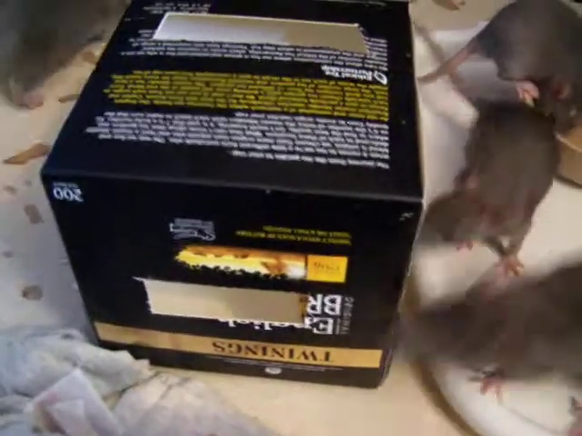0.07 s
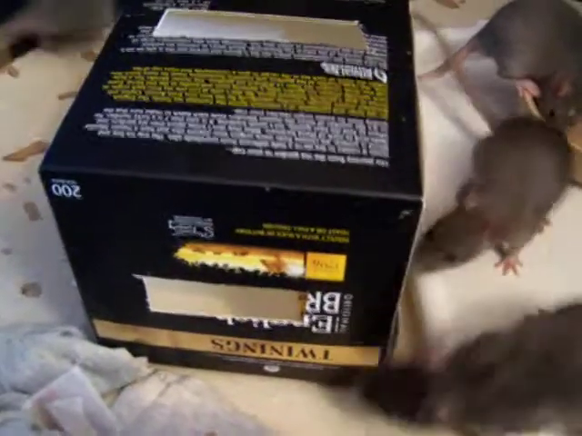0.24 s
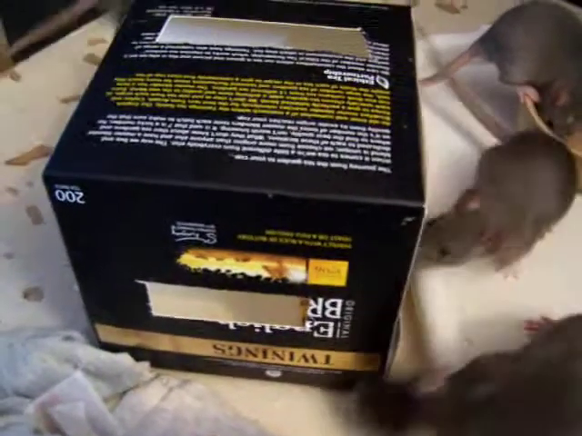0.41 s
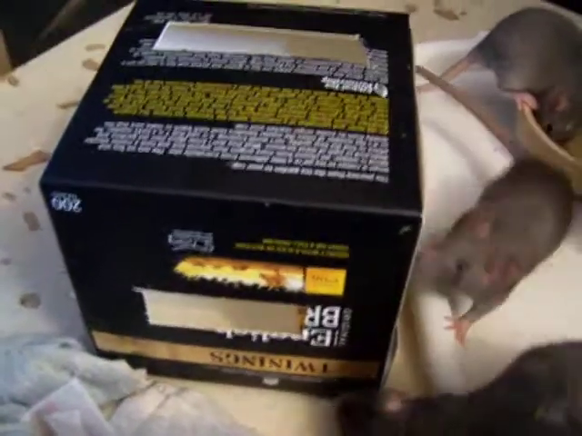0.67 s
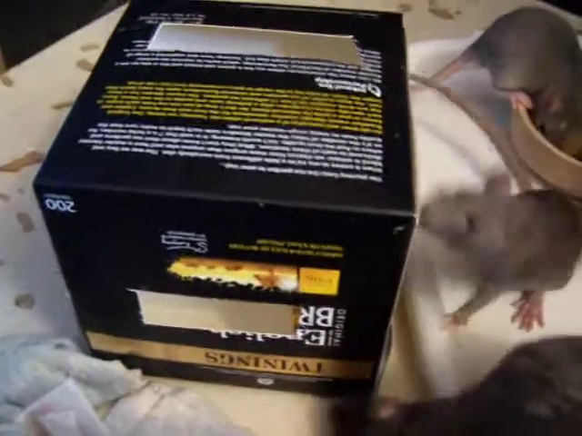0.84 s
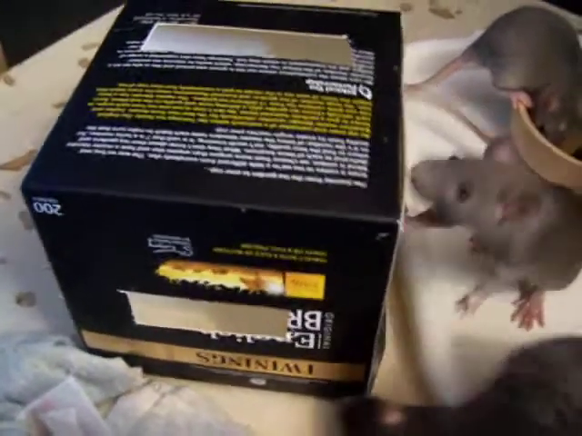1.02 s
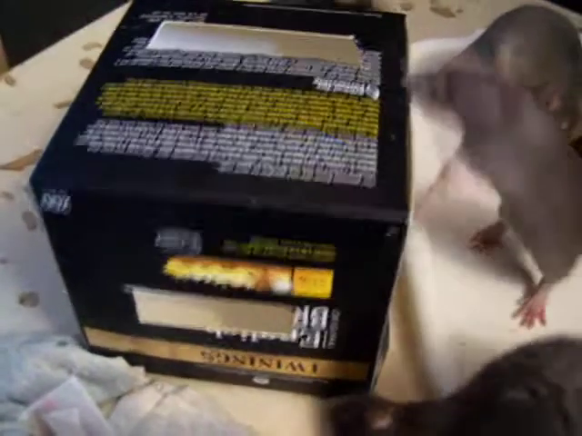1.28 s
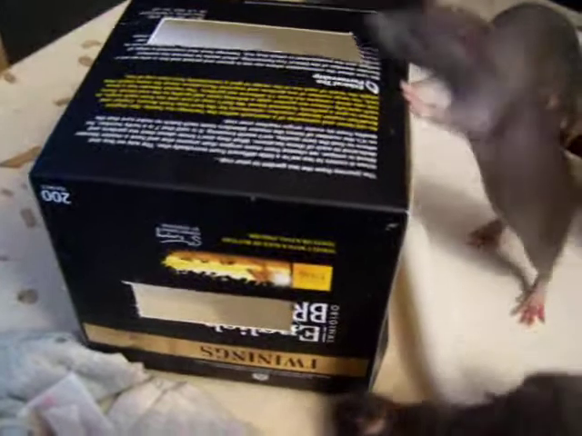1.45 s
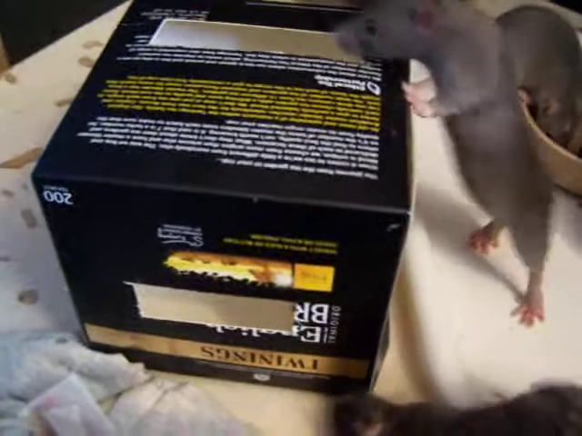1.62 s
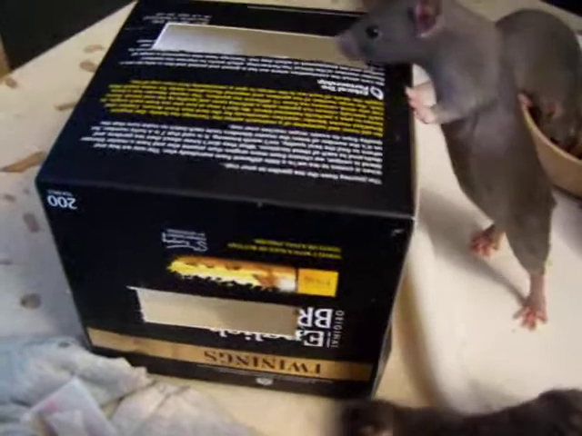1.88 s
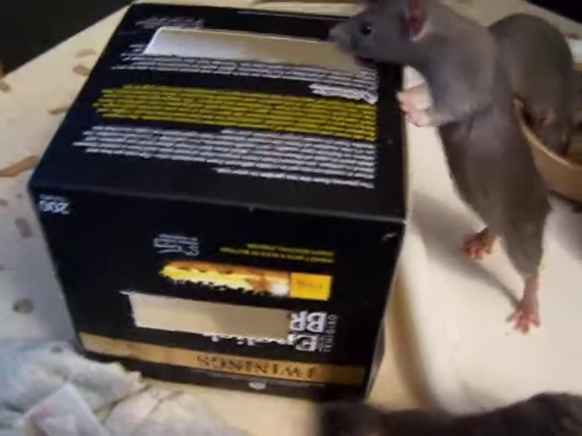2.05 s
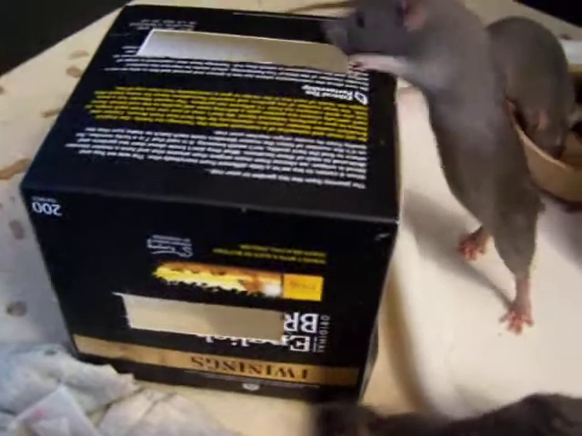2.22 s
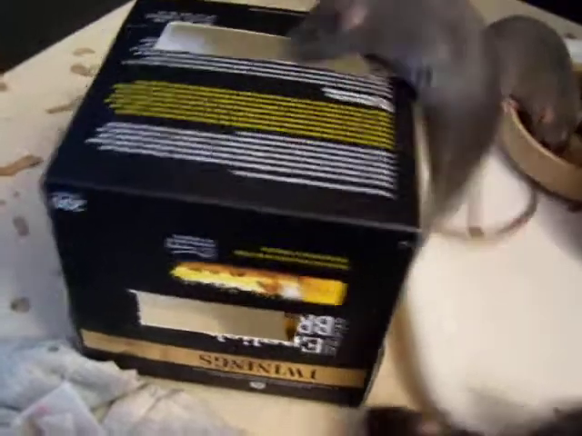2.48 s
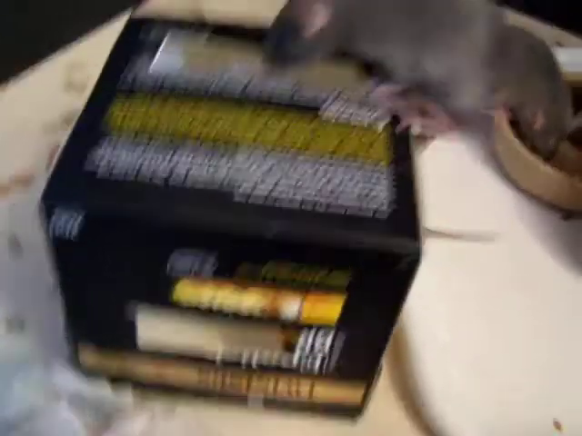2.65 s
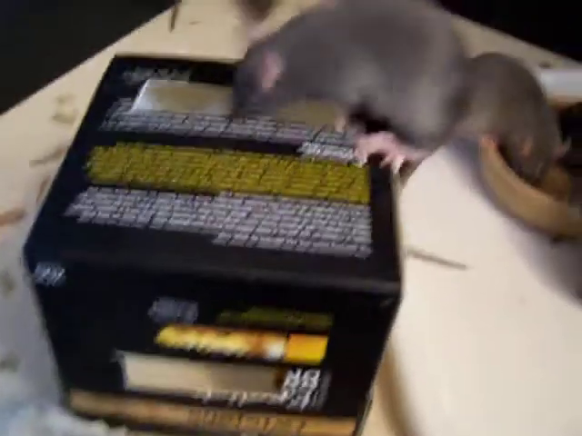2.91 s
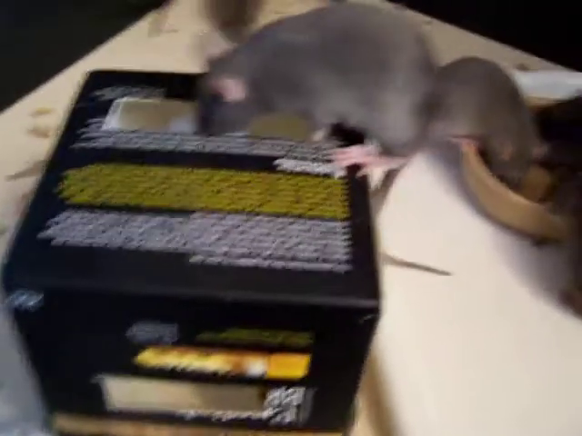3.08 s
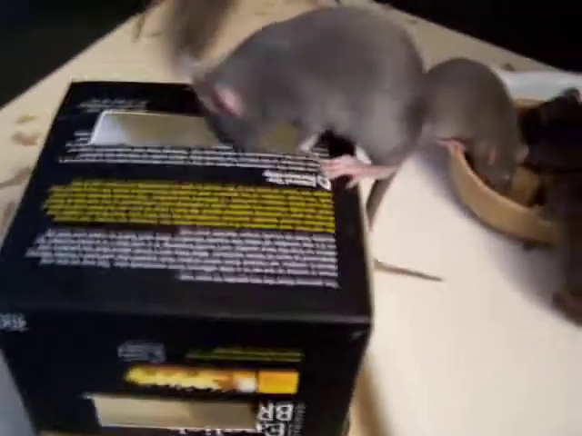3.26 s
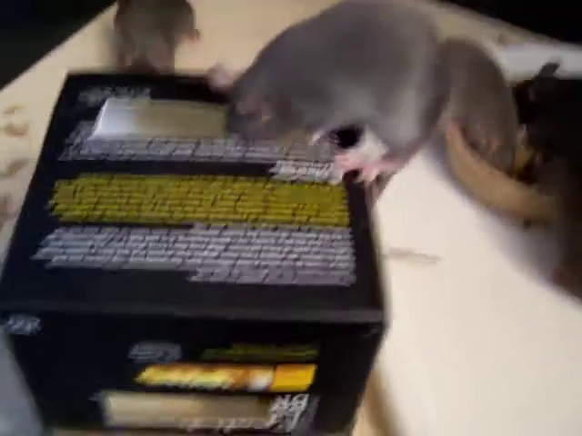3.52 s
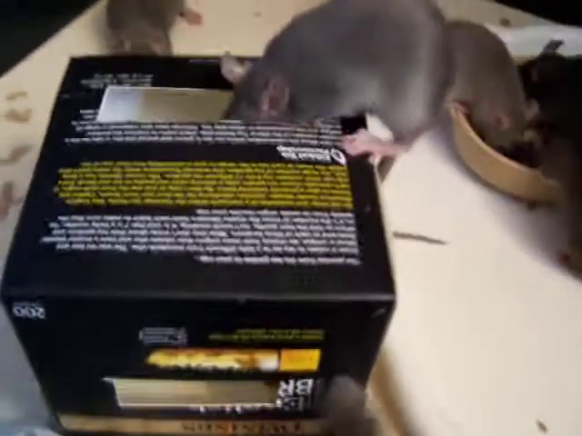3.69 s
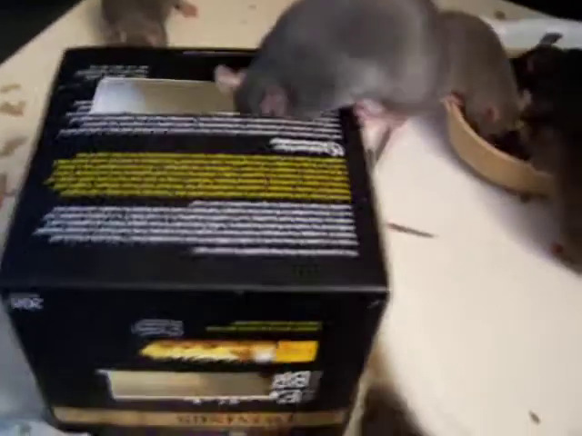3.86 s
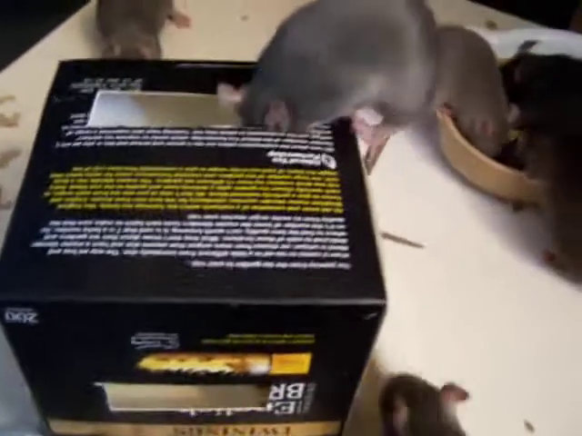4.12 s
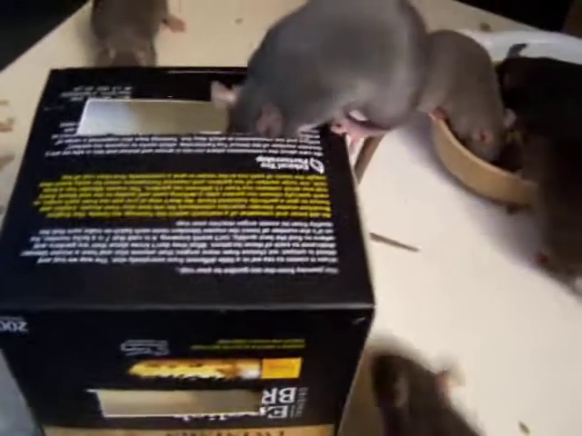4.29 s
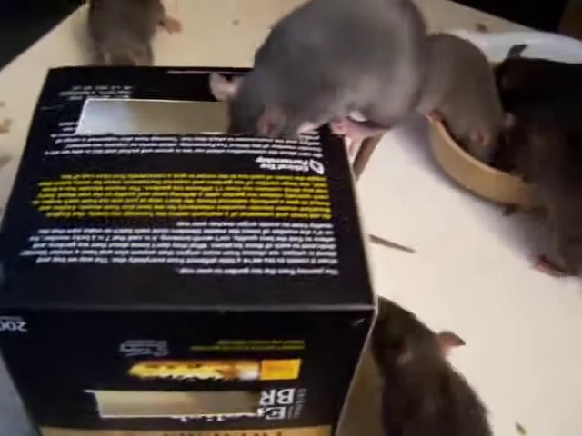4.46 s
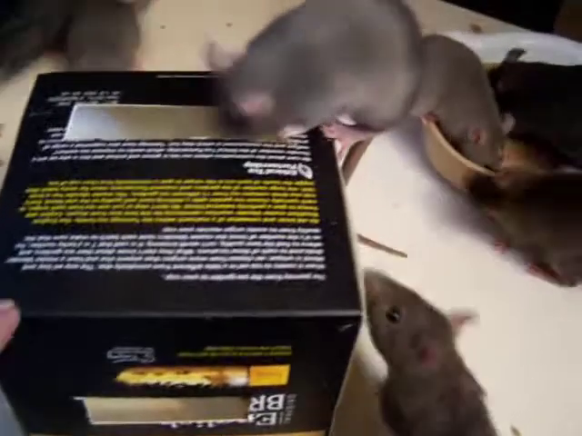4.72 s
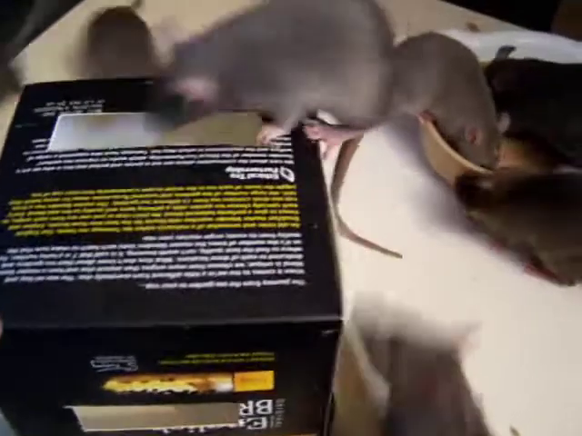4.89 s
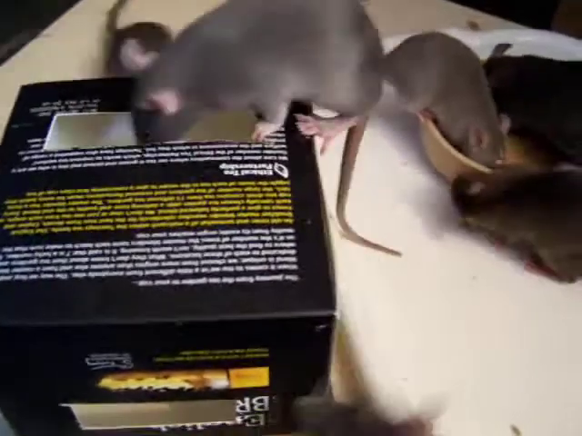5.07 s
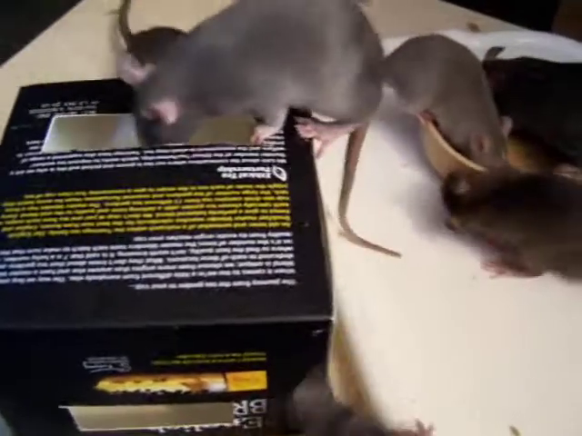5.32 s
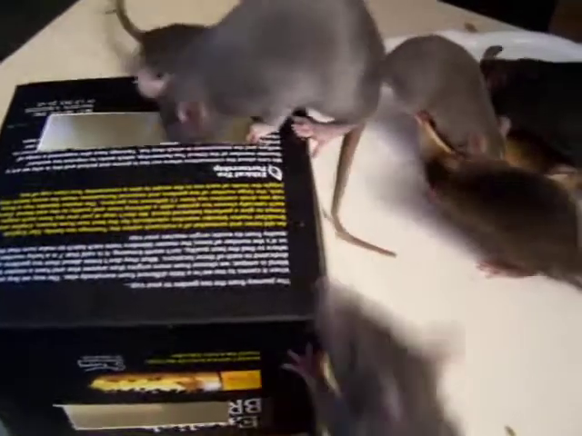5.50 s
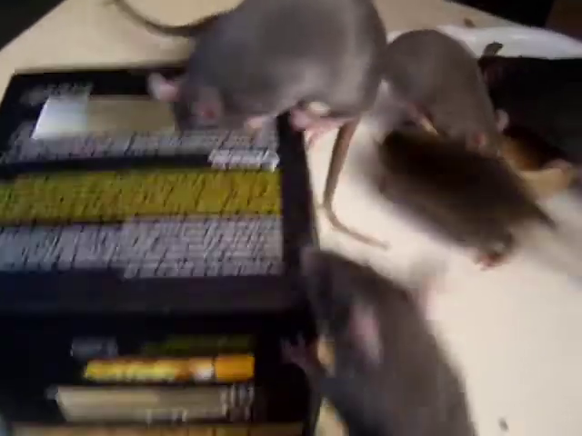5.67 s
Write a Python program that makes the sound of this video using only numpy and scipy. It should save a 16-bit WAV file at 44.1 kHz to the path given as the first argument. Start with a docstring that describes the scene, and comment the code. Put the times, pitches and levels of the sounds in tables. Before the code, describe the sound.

Heard closely from above, young rats clamber on a small hollow cardboard box in a quiet room. From 0 to 1 second, a run of light claw scratches and ticks mixes with soft paw thumps, with a clearer scratch near 0.85. Around 1 to 1.5 come brief dry foot wipes and low bumps, then a sparser stretch of ticks to 2.3. At 2.4 to 3 the climb is busiest: hollow knocks, two strong scrapes at about 2.5 and 2.6, short ringing rasps, swelling rustle and a crisp tick. A sharp snap lands at 3.5 amid sliding. Softer scuffs follow, with a strong click near 4.5, quick bright ticks around 4.8, and small scratches and bumps from 5.2 to the end. Fine pattering runs throughout. Close walls add a short diffuse tail; soft room noise and a faint, wavering high whine stay beneath, through a small narrow-band microphone.

```python
"""Young rats clamber on a small cardboard box in a quiet room, heard by a small microphone close above.
Claws catch and skid on the stiff card in runs of tiny slips, and longer drags make one resonance ring.
Paws thump the hollow panels: a swinging panel, box modes and a dull thud. Fur and feet slide in a fine
rustle of filtered friction grains, and small scuffs patter round the box.
Close walls add a short, diffuse tail. Behind lie soft, coloured room noise and a faint, wavering whine."""
import sys
import numpy as np
from scipy import signal
from scipy.fft import rfft, irfft
from scipy.io import wavfile

SR = 44100
rng = np.random.default_rng(int(sys.argv[2]) if len(sys.argv) > 2 else 0)


def put_to_file(sound):
    """Save the sound as 16-bit audio at rate SR, in the file named by the first command-line argument."""
    columns = np.atleast_2d(sound).T  # one column per channel
    safe = np.clip(columns, -1, 1)
    whole_steps = np.round(safe * 32767)
    wavfile.write(sys.argv[1], SR, whole_steps.astype(np.int16))


N = 253134
TIME = np.arange(N) / SR
MS = 1e-3  # seconds in a millisecond
FFT_SIZE = 2048
FREQS = np.maximum(np.fft.rfftfreq(FFT_SIZE, 1 / SR), 1)  # Hz, kept above zero for the logarithm

# bodies sliding on the card, loudest as one rat climbs onto the lid: (time [s], relative level [dB])
SLIDING_LEVELS = [(0, -50), (.6, -50.5), (1.2, -57), (1.7, -52), (2.0, -56), (2.4, -46.5), (2.66, -38),
                  (2.78, -38.5), (2.97, -42), (3.17, -47.5), (3.27, -44.5), (3.45, -39), (3.56, -44.5),
                  (3.7, -38), (3.8, -48), (4.3, -47), (5.1, -46), (5.4, -49), (5.7, -43.5)]
# single wipes of a foot over the card: (middle [s], relative level [dB], Gaussian half-length [ms])
FOOT_WIPES = [(.235, -46, 36), (0.791, -53, 25), (1.024, -41.5, 44), (1.448, -40.5, 19), (2.865, -36.5, 12),
              (3.921, -42.5, 33), (4.131, -43, 59), (4.511, -51, 58), (4.639, -40.5, 35.5),
              (4.819, -43.5, 39), (5.106, -40.5, 6.2), (5.539, -37, 28)]
# paws landing on the panels: (time [s], level before trim [dB], panel pitch [Hz])
PAW_LANDINGS = [(.0325, -32, 575), (.411, -38.5, 197), (0.557, -41.5, 188), (.955, -30, 609),
                (1.412, -39, 208), (1.439, -40, 730), (1.807, -37.5, 675), (1.811, -41, 388),
                (2.036, -38, 217), (2.202, -40, 602), (2.3266, -36, 393), (2.4212, -28, 710),
                (2.5036, -41.5, 394), (2.624, -44, 670), (2.6542, -40.5, 204), (2.7072, -38.5, 337),
                (2.8458, -38.5, 379), (3.4967, -33, 533), (3.9704, -36, 598), (4.473, -40.5, 241),
                (5.0701, -38, 149), (5.3358, -37.5, 646), (5.4955, -38, 610)]
# claw strokes: (peak [s], level before trim [dB], decay [ms], ring of the struck spot [Hz],
# strength of the treble tilt [dB])
CLAW_STROKES = [(.0945, -37, 5.9, 3260, -10.5), (.1529, -30, 3.2, 3400, -1),
                (0.2047, -29.5, 5.8, 3360, -2.5), (.2439, -30.5, 2.8, 2100, -10.5),
                (0.419, -39, 13, 1870, -6), (.5167, -35.5, 2.3, 3910, 3), (.5639, -31, 3.1, 3550, -4.5),
                (.6766, -30, 3.3, 2500, -9.5), (.7365, -31.5, 1.9, 3700, -5.5), (.7815, -35.5, 8, 3870, -3),
                (.8456, -22.5, 5, 3200, -2), (.8875, -34.5, 3.2, 3700, -7), (.9505, -33, 4.5, 1960, -7.5),
                (1.5627, -33.5, 2.7, 3240, -6), (1.8122, -30, 4.6, 2820, -4.5),
                (2.0376, -30.5, 2.55, 4340, -1.5), (2.1972, -36, 5, 3110, -5), (2.253, -33.5, 5, 4970, 8),
                (2.4193, -32.5, 4.2, 3670, 1), (2.499, -20, 4.05, 3200, 0.5),
                (2.6252, -18.5, 3.7, 3010, 1.5), (2.643, -30, 7.6, 3130, -3.5),
                (2.7965, -28.5, 4.2, 1550, -21), (2.92, -29.5, 2.8, 3490, 17),
                (2.9616, -19.5, 1.54, 4130, 9), (2.9867, -28, 2.2, 3130, -6), (3.4247, -29, 1.3, 2940, -5),
                (3.4972, -17, 0.63, 4000, -4.5), (3.9726, -31.5, 8, 3020, -5.5),
                (4.0896, -28.5, 5.3, 2230, 2.5), (4.215, -30.5, 2.5, 3230, 20.5),
                (4.4657, -15.5, 2.63, 2390, 2.5), (4.6894, -32, 1.8, 3390, -2),
                (4.7514, -32, 1.7, 3340, -6.5), (4.7778, -29.5, 2.5, 4180, -7.5),
                (4.7853, -22.5, 2.1, 4020, 6), (4.9437, -30.5, 3.7, 3770, 0), (4.9657, -26, 1.3, 3560, -3),
                (5.1925, -31.5, 1.6, 2780, 0), (5.3298, -29.5, 6.6, 2780, -6),
                (5.5325, -27.5, 4.4, 2650, -3), (5.5558, -30, 4.3, 2780, -4),
                (5.7344, -26.5, 3.5, 2400, -5.5)]
# claws dragged along an edge: (middle [s], level [dB], card pitch [Hz], Gaussian half-length [ms])
EDGE_RASPS = [(1.463, -45, 2600, 14), (2.504, -31, 1436, 4.5), (2.586, -41.5, 3380, 12),
              (2.616, -28, 3340, 5), (3.31, -49, 2505, 59), (3.92, -48, 1360, 13), (4.65, -45, 1340, 9.4),
              (5.001, -36.5, 1310, 1.6)]
# low modes of the hollow box: (frequency [Hz], relative gain [dB], t60 [s])
HOLLOW_BOX_MODES = [(188, -16.5, 0.061), (391, -8, 0.26), (600, -9, 0.033), (705, 3, 0.068)]
# spectrum of the room noise: (frequency [Hz], relative density [dB per Hz])
ROOM_SPECTRUM = [(20, -3), (43, 3), (70, -3.5), (115, 3.5), (260, 0.5), (420, -7.5), (680, -11.5),
                 (1000, -8), (1900, -12.5), (3000, -9), (4400, -7.5), (5400, -15.5), (7900, -20),
                 (8600, -39.5)]
# spectrum of fur and feet on the surface: (frequency [Hz], relative density [dB per Hz])
RUSTLE_SPECTRUM = [(500, -25.5), (950, -5.5), (1350, -3.5), (2000, -5.5), (2650, -2), (3100, -1.5),
                   (3600, 2), (4700, -3), (5900, -11.5), (7300, -14.5), (8500, -38.5)]
# spectrum of the hollow box, for thuds, rumble and pads: (frequency [Hz], relative density [dB per Hz])
BOX_SPECTRUM = [(40, -14.5), (120, -1.5), (230, -6.5), (340, -0.5), (470, -6), (560, -3), (670, 3.5),
                (850, -10.5), (1300, -8), (3000, -60.5)]
# spectrum of claws on card: (frequency [Hz], relative density [dB per Hz])
CLAW_SPECTRUM = [(120, -14), (350, -8), (700, -9.5), (1100, -6), (1700, -2), (3000, 2.5), (4600, 1.5),
                 (5700, -6), (7500, -14.5), (8600, -37)]

ROOM_DB, WHINE_DB = -54, -57.5
WHINE_HZ, WHINE_SWING_HZ, WHINE_RATE_HZ = 4137, 52, 4.4
ROOM_T60_S, ECHO_DB = 0.12, -12
# the patter follows the rubbing by this power
PATTER_FOLLOWS = 0.38
# a panel at slack_hz swings with this decay; lower ones swing longer
PANEL_DECAY_MS, PANEL_DECAY_POWER = 7.1, 0.36
# a claw that skids for longer also takes longer to bite: rise at the typical decay, and its power law
RISE_MS, TYPICAL_DECAY_MS, RISE_POWER = 2.22, 3.3, 1.45
CUTOFF_HZ = 8900


def from_db(db):
    """Decibels to amplitude gain."""
    return 10 ** (np.asarray(db) / 20)


def rms_one(x):
    """Scale to unit power."""
    return x / np.sqrt(np.mean(x ** 2) + 1e-20)


def tone_db(points):
    """Spread a short spectrum over all frequencies, straight in dB against log frequency."""
    hz, db = np.transpose(points)
    return np.interp(np.log(FREQS), np.log(hz), db)


def colour(x, db):
    """Causal (minimum-phase) filter with the given gain per frequency."""
    cepstrum = irfft(np.log(from_db(db)))
    # folding the cepstrum onto positive times makes the phase minimal
    cepstrum[1:FFT_SIZE // 2] *= 2
    cepstrum[FFT_SIZE // 2 + 1:] = 0
    impulse_response = irfft(np.exp(rfft(cepstrum)))
    return signal.fftconvolve(x, impulse_response)[:len(x)]


def drift(rate):
    """Random glide of unit power between fresh values drawn rate times a second."""
    return rms_one(np.interp(TIME * rate, np.arange(N), rng.standard_normal(N)))


def ring(push, hz, t60):
    """One decaying mode: a two-pole resonator that falls 60 dB in t60 seconds."""
    radius = from_db(-60 / (t60 * SR))
    angle = 2 * np.pi * hz / SR
    poles = [1, -2 * radius * np.cos(angle), radius ** 2]
    return signal.lfilter([0, np.sin(angle)], poles, push + 1e-18)


def slips(per_s, spread_db, size):
    """Stick-slip: clicks at random moments, of uneven size and either sign."""
    born = rng.random(size) < per_s / SR
    sign = rng.choice([-1, 1], size)
    strength = from_db(spread_db * np.clip(rng.standard_normal(size), -2, 2))
    return born * sign * strength


def gaussian(middle_s, half_ms):
    """A smooth swell over the whole scene, with half_ms as its standard deviation."""
    return np.exp(-((TIME - middle_s) / (half_ms * MS)) ** 2 / 2)


def with_energy_of(x, envelope):
    """Give a burst the energy of its envelope."""
    return rms_one(x) * np.sqrt(np.mean(envelope ** 2))


def add(out, start_s, burst):
    """Mix a burst in at its moment, trimmed to the scene."""
    at = round(start_s * SR)
    burst = burst[max(-at, 0):max(N - at, 0)]
    out[max(at, 0):max(at, 0) + len(burst)] += burst


def background(crest_s=0.084, wander_hz=14, flutter_db=1.0):
    """Steady room noise and a thin whine whose pitch swings a few times a second."""
    air = from_db(ROOM_DB) * rms_one(colour(rng.standard_normal(N), tone_db(ROOM_SPECTRUM)))
    swing = WHINE_SWING_HZ * np.cos(2 * np.pi * WHINE_RATE_HZ * (TIME - crest_s))
    hz = WHINE_HZ + swing + wander_hz * drift(60)
    whine = np.sin(2 * np.pi * np.cumsum(hz) / SR) * from_db(flutter_db * drift(10))
    return air + from_db(WHINE_DB) * rms_one(whine)


def drag():
    """How hard the card is rubbed: slowly shifting bodies, plus a short swell for each wipe of a foot."""
    bodies = from_db(np.interp(TIME, *np.transpose(SLIDING_LEVELS)))
    feet = sum(from_db(db) * gaussian(s, half_ms) for s, db, half_ms in FOOT_WIPES)
    return np.hypot(bodies, feet)


def sliding(grains_per_s=7000, grain_spread_db=3.0, ticks_per_s=100, tick_spread_db=2.0, tick_db=-9,
            jerk_db=3.0, rustle_db=-1.03, rumble_db=-7.0, lurch_db=3.0):
    """Fur and pads drag in small jerks: grains and stray ticks on the surface, a rumble in the hollow box."""
    grains = rms_one(slips(grains_per_s, grain_spread_db, N))
    ticks = rms_one(slips(ticks_per_s, tick_spread_db, N))
    friction = from_db(jerk_db * drift(80)) * (grains + from_db(tick_db) * ticks)
    surface = from_db(rustle_db) * rms_one(colour(friction, tone_db(RUSTLE_SPECTRUM)))
    lurching = grains * from_db(lurch_db * drift(40))
    hollow = from_db(rumble_db) * rms_one(colour(lurching, tone_db(BOX_SPECTRUM)))
    return drag() * (surface + hollow)


def scuffs(per_s, spread_db, decay_ms, tone):
    """Short bursts of friction at random moments, each dying away; unit power."""
    steps = np.abs(slips(per_s, spread_db, N))
    fade = np.exp(-1 / (decay_ms * MS * SR))
    envelope = signal.lfilter([1], [1, -fade], steps + 1e-18)
    return rms_one(colour(envelope * rng.standard_normal(N), tone_db(tone)))


def patter(tips_db=-53.5, pads_db=-61):
    """Other feet tiptoe round the box, claw tips ticking and pads bumping, harder when the rats are busy."""
    tips = from_db(tips_db) * scuffs(per_s=55, spread_db=5.0, decay_ms=2.6, tone=CLAW_SPECTRUM)
    pads = from_db(pads_db) * scuffs(per_s=20, spread_db=0.5, decay_ms=8.7, tone=BOX_SPECTRUM)
    return rms_one(drag() ** PATTER_FOLLOWS) * (tips + pads)


def paws(push_ms=1.16, box_db=-9.0, thud_db=-9, slack_db=8, slack_hz=500, level_db=1.0):
    """A soft push sets the trodden panel swinging, with the modes of the box and a dull thud."""
    out = np.zeros(N)
    t = np.arange(2 * FFT_SIZE) / SR
    for s, db, hz in PAW_LANDINGS:
        decay_ms = PANEL_DECAY_MS * (slack_hz / hz) ** PANEL_DECAY_POWER
        envelope = (1 - np.exp(-t / (push_ms * MS))) * np.exp(-t / (decay_ms * MS))
        envelope /= envelope.max()
        push = rng.standard_normal(len(t)) * envelope
        panel = rms_one(np.sin(2 * np.pi * hz * t) * envelope)
        box = rms_one(sum(from_db(mode_db) * ring(push, mode_hz, t60)
                          for mode_hz, mode_db, t60 in HOLLOW_BOX_MODES))
        slackness = np.log2(slack_hz / hz)  # octaves; low, slack panels thud more
        band = signal.butter(2, [hz / 2, 2 * hz], "band", fs=SR, output="sos")
        soft = signal.sosfilt(band, push)
        thud = from_db(thud_db + slack_db * slackness) * rms_one(colour(soft, tone_db(BOX_SPECTRUM)))
        landing = panel + from_db(box_db) * box + thud
        add(out, s, from_db(db + level_db) * with_energy_of(landing, envelope))
    return out


def claws(slips_per_s=7000, spread_db=3, snap=0.43, ring_db=8.0, ring_width_hz=260, level_db=-0.63):
    """A claw skids in a run of tiny slips; the card rings at a pitch set by the spot."""
    out = np.zeros(N)
    t = (np.arange(2 * FFT_SIZE) - FFT_SIZE // 2) / SR  # zero at the peak of the stroke
    tilt = tone_db([(900, -0.91), (1800, -0.34), (5000, 0.87)])  # sharp tips sound brighter than blunt ones
    for s, db, decay_ms, hz, treble_db in CLAW_STROKES:
        rise_ms = RISE_MS * (decay_ms / TYPICAL_DECAY_MS) ** RISE_POWER
        # a quick bite, then a fade
        envelope = np.exp(-np.where(t < 0, (t / (MS * rise_ms)) ** 2, t / (MS * decay_ms)))
        skid = slips(slips_per_s, spread_db, len(t)) * envelope
        # sudden strokes have a stronger snap at the peak
        force = skid + snap * np.exp(-rise_ms) * np.linalg.norm(skid) * (t == 0)
        spot = ring_db / (1 + ((FREQS - hz) / ring_width_hz) ** 2)
        card = colour(force, tone_db(CLAW_SPECTRUM) + treble_db * tilt + spot)
        add(out, s + t[0], from_db(db + level_db) * with_energy_of(card, envelope))
    return out


def rasps(slips_per_s=4000, ring_t60_s=0.02):
    """A claw dragged along an edge feeds its slips to one resonance of the card."""
    out = np.zeros(N)
    for s, db, hz, half_ms in EDGE_RASPS:
        envelope = gaussian(s, half_ms)
        card = ring(slips(slips_per_s, 0, N) * envelope, hz, ring_t60_s)
        out += from_db(db) * with_energy_of(card, envelope)
    return out


def room_echo(x, size=16384):
    """Close walls and the table return a short, diffuse tail of decaying noise."""
    t = np.arange(size) / SR
    fade = from_db(-60 * t / ROOM_T60_S) * (t > 3 * MS)  # the first return comes after 3 ms
    tail = rng.standard_normal(size) * fade
    return from_db(ECHO_DB) * signal.fftconvolve(x, tail / np.linalg.norm(tail))[:N]


def scene():
    """The rats on their box, heard from close above, with the room around them."""
    rats = sliding() + patter() + paws() + claws() + rasps()
    return (rats + room_echo(rats) + background())[None]


def record(dry):
    """A small microphone with a narrow band: a steep low-pass at the cutoff."""
    lowpass = signal.ellip(10, .3, 70, CUTOFF_HZ, fs=SR, output="sos")
    return signal.sosfilt(lowpass, dry)


dry = scene()
out = record(dry)
put_to_file(out)
```